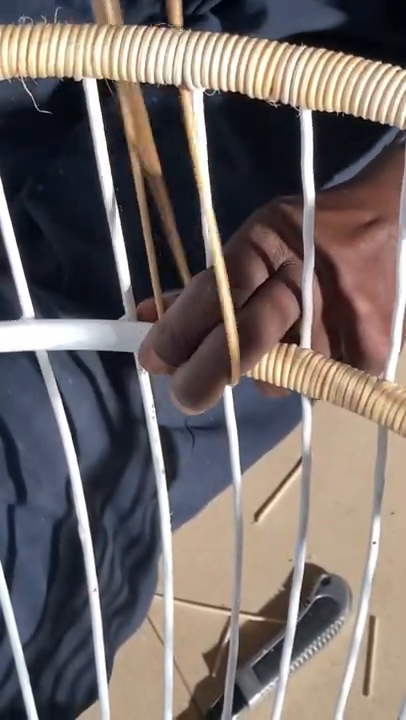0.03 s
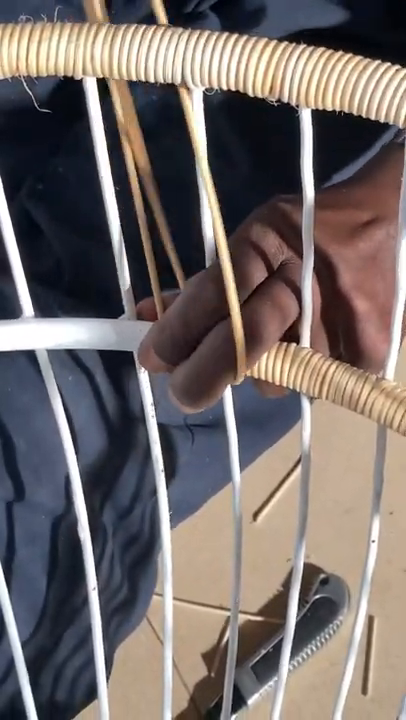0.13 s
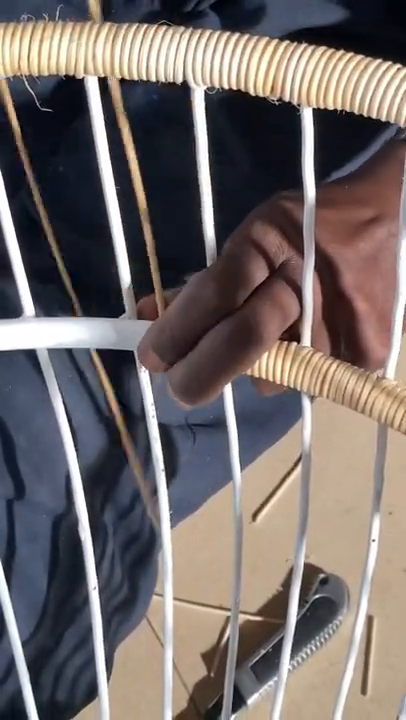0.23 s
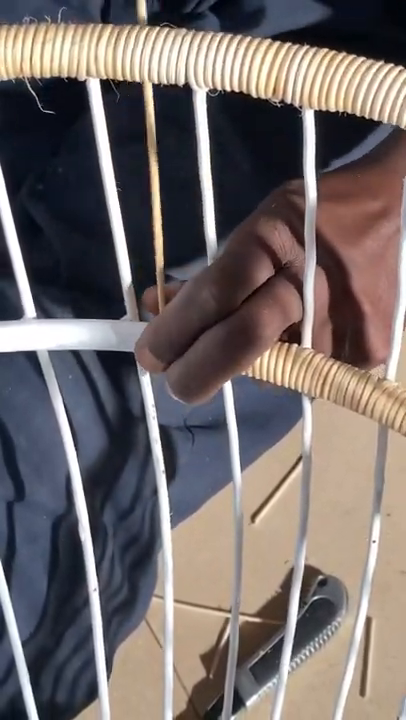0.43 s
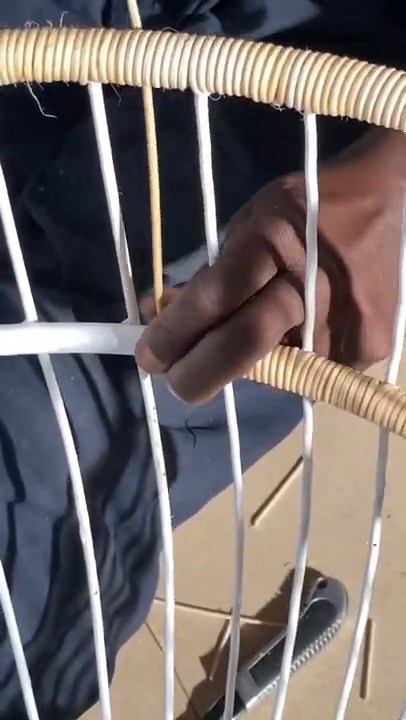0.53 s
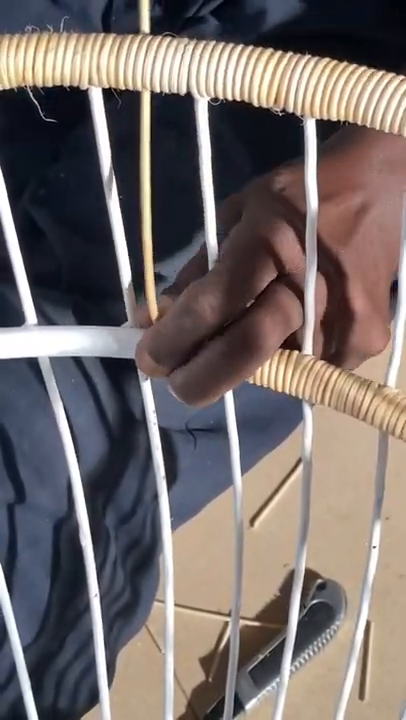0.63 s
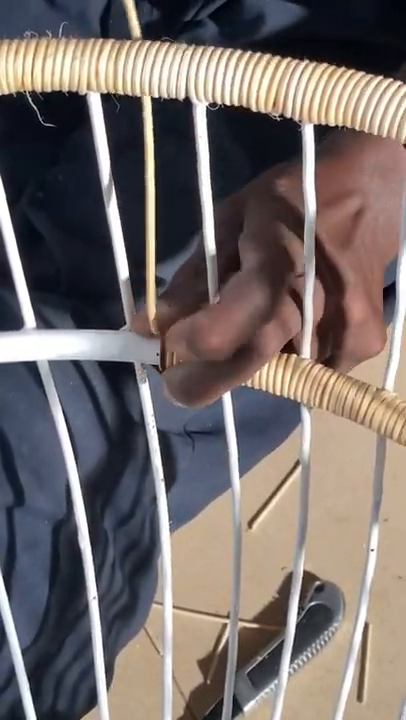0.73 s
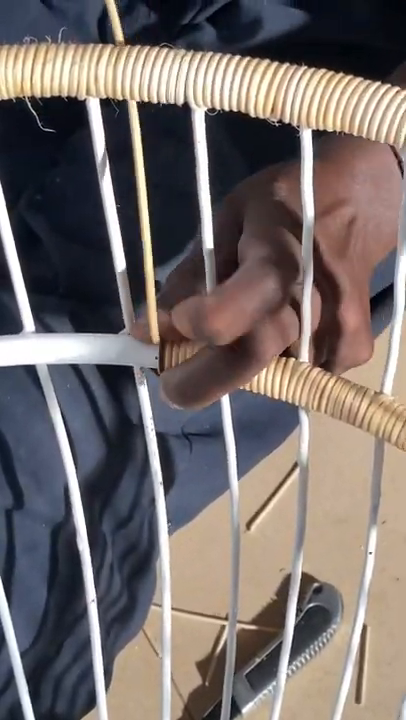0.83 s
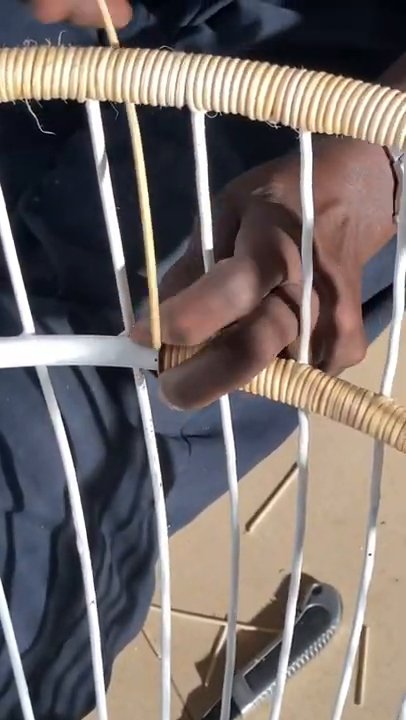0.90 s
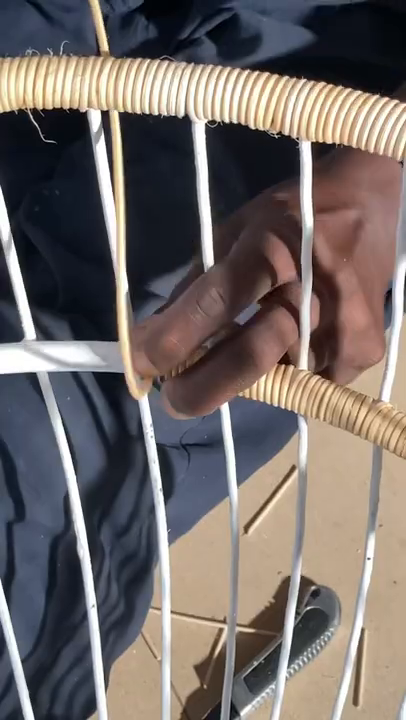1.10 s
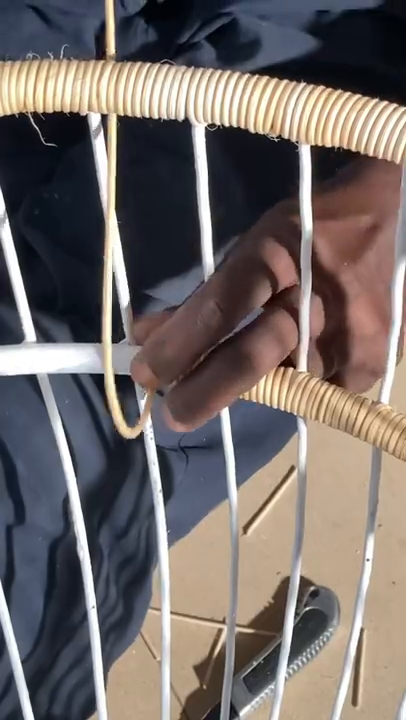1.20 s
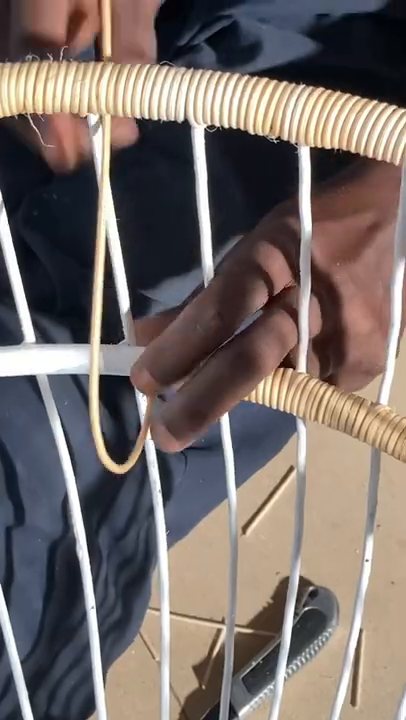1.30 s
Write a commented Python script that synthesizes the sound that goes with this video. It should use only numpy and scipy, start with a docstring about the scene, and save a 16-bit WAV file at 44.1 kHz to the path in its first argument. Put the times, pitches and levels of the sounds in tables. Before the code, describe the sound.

Cane is pulled through a metal chair frame with sharp snaps and a dull thud.

```python
"""Caning a steel chair

A cane strand hisses and ticks as it is drawn through a steel chair frame, close to two microphone
ports. Its loose end whips a ringing rod, then it snaps taut: the frame thuds and the windings clatter.
Fingers rub the strand into place over a quiet outdoor rumble and a faint hum."""
import sys
import numpy as np
from scipy import signal
from scipy.fft import rfft, irfft, next_fast_len
from scipy.io import wavfile
from scipy.ndimage import map_coordinates

SR = 44100
rng = np.random.default_rng(int(sys.argv[2]) if len(sys.argv) > 2 else 0)


def put_to_file(sound):
    """Save the sound as 16-bit audio at rate SR, in the file named by the first command-line argument."""
    columns = np.atleast_2d(sound).T  # one column per channel
    safe = np.clip(columns, -1, 1)
    whole_steps = np.round(safe * 32767)
    wavfile.write(sys.argv[1], SR, whole_steps.astype(np.int16))


N = 59535
TIME = np.arange(N) / SR
CRACK_ATTACK_S, FRAME_ATTACK_S = 0.00012, 0.0017


def amp(db):
    """Decibels to gain."""
    return 10 ** (np.asarray(db) / 20)


def unit(x):
    """Scale to rms 1."""
    return x / np.sqrt(np.mean(x ** 2) + 1e-20)


def along(points, hz):
    """Read a curve of (Hz, value) points on a log frequency axis."""
    freqs, values = np.transpose(points)
    return np.interp(np.log(hz + 1), np.log(freqs + 1), values)


def grid():
    """Frequencies of the padded transform, in Hz."""
    return np.fft.rfftfreq(2 * next_fast_len(N // 2 + 2048, True), 1 / SR)


def coloured(x, points, tilt_db=0):
    """Causal EQ through (Hz, dB) points that keeps the power of white noise."""
    hz = grid()
    octaves = np.log2(np.maximum(hz, 300) / 300)
    gain = unit(amp(along(points, hz) + tilt_db * octaves))
    cepstrum = irfft(np.log(gain + 1e-6))
    size = len(cepstrum)
    cepstrum[1:size // 2] *= 2  # fold to minimum phase
    cepstrum[size // 2 + 1:] = 0
    return irfft(rfft(x, size) * np.exp(rfft(cepstrum)))[..., :N]


def noise():
    """White noise in two rows: the part both ports share, and the part they do not."""
    return rng.standard_normal((2, N))


def grains(rate):
    """Tiny contacts of random time and size, rate a second, at rms 1."""
    return unit(noise() * (rng.random(N) < rate / SR))


def wobble(rate):
    """A smooth random curve, rate knots a second."""
    knots = rng.standard_normal(int(N * rate / SR) + 4)
    return map_coordinates(knots, [TIME * rate])


def decay(start, t60, attack):
    """An envelope with a quick rise and an exponential fall."""
    age = np.maximum(TIME - start, 0)
    return (1 - np.exp(-age / attack)) * np.exp(-np.log(1000) * age / t60)


def cue(tail, start, attack):
    """Fade a tail in and place it at its start time."""
    rise = 1 - np.exp(-np.arange(tail.shape[1]) / SR / attack)
    return np.pad(tail * rise, ((0, 0), (round(start * SR), N)))[:, :N]


def ring(start, modes, attack):
    """Decaying modes, each with a random phase."""
    t = np.arange(int(SR * max(t60 for hz, db, t60 in modes))) / SR
    tail = sum(amp(db - 60 * t / t60) * np.sin(2 * np.pi * (hz * t + rng.random((2, 1))))
               for hz, db, t60 in modes)
    return cue(np.sqrt(2) * tail, start, attack)


def wash(start, t60s, attack=0.0012):
    """A diffuse noisy tail in which each frequency dies at its own speed."""
    hz, t, spectrum = signal.stft(rng.standard_normal((2, SR * 2 // 3)), SR, nperseg=256)
    fade = np.exp(-np.log(1000) * t / along(t60s, hz)[:, None])
    tail = signal.istft(spectrum * fade, SR, nperseg=256)[1]
    return cue(tail, start, attack)


def shimmer(start, t60s, attack=0.002, count=900):
    """A metallic tail of many weak, close modes of random pitch and size."""
    jitter, chance, *phases = rng.random((count, 4)).T
    hz = (np.arange(count) + jitter) / count * SR / 2
    power = -np.log(chance + 1e-9)
    poles = (2j * np.pi * hz - np.log(1000) / np.maximum(along(t60s, hz), 0.01)) / SR
    weights = np.sqrt(2 * power / power.sum()) * np.exp(2j * np.pi * np.array(phases))
    step = np.arange(150)  # 150 blocks of 150 samples
    block_starts = weights[:, None] * np.exp(np.outer(step * len(step), poles))
    tail = (block_starts @ np.exp(np.outer(poles, step))).real.reshape(2, -1)
    return cue(tail, start, attack)


# Tone of the outdoor air. Each row: frequency in Hz, relative gain in dB.
RUMBLE_EQ = [(20, -8), (40, -4), (65, 6), (100, -7), (150, -7.5), (200, -9.5), (280, -7.5), (450, -17),
             (560, -14), (750, -25), (1080, -20), (1350, -26.5), (1900, -25.5), (2400, -28.5),
             (3200, -37.5), (6000, -57), (9500, -49), (15000, -54), (16200, -69)]
# Notes of the hum. Each row: pitch in Hz, level in dB.
HUM_TONES = [(60, -60.5), (129, -61.5)]

def background(rumble_db=-51.5, swell_db=1, waver_db=2.5):
    """A bed of low outdoor rumble and faint wavering hum."""
    hum = 0
    for hz, db in HUM_TONES:
        level = amp(db + waver_db * wobble(7.9))
        phase = 2 * np.pi * (hz * TIME + rng.random((2, 1))) + 0.5 * wobble(5.9)
        hum += level * np.sin(phase)
    return amp(rumble_db + swell_db * wobble(8)) * coloured(noise(), RUMBLE_EQ) + hum


def frame_swing(level_db=-47, t60_s=0.38):
    """The frame's lowest mode, already swinging from handling, fades away."""
    lowest_hz = FRAME_MODES[0][0]
    return ring(0, [(lowest_hz, level_db, t60_s)], FRAME_ATTACK_S)


# Fader curve of the sliding strand. Each row: time in seconds, level in dB.
SLIDE_LEVELS = [(0, -47), (.03, -54.5), (.09, -57), (.118, -51.5), (0.161, -60), (0.222, -44), (.41, -59.5),
                (0.599, -57), (0.691, -70.5), (.8, -72.5), (.87, -68), (.93, -70), (0.999, -81), (1.2, -82),
                (1.271, -74.5), (1.35, -75)]
# Its bright hiss. Each row: frequency in Hz, relative gain in dB.
SLIDE_EQ = [(300, -14), (1200, 2), (2300, 3), (4000, 6.5), (6000, 4), (9500, 3), (13000, -14), (15200, -13),
            (16500, -33)]

def slide(rough_db=2.0, fibres_per_s=440, fibre_db=-7):
    """Cane rubs over steel and skin: an uneven hiss with tiny catches of its fibres."""
    level_db = np.interp(TIME, *np.transpose(SLIDE_LEVELS)) + rough_db * wobble(90)
    friction = noise() + amp(fibre_db) * grains(fibres_per_s)
    return coloured(amp(level_db) * friction, SLIDE_EQ)


# Ticks and snaps of the cane. Each row: start in seconds, level in dB, crack t60 in seconds,
# tail in dB relative to the snap, tilt in dB per octave.
SNAP_CUES = [(.006, -48, 0.0024, -26.5, -10), (.0095, -28.5, 0.0056, -31.5, 4.5),
             (.0510, -30.5, 0.0053, -20.5, 4), (0.1953, -30.5, .006, -36.5, 7),
             (0.4380, -18, 0.0056, -24.5, 2.5), (0.4526, -19.5, 0.0018, -37, 6),
             (0.4661, -21.5, 0.0233, -18, -0.4), (0.4692, -14, 0.0063, -22.5, 0.2),
             (.9145, -47.5, 0.0032, -49, 4)]
# Their crisp tone. Each row: frequency in Hz, relative gain in dB.
SNAP_EQ = [(150, -9.5), (650, -13), (950, -19), (1600, -9), (2900, -8.5), (4000, 4.5), (4700, -0.5),
           (5600, -11), (7300, -1), (8600, 1), (10700, -4.5), (12500, -8), (15400, -10), (16500, -37)]
# Their tail through frame and windings. Each row: frequency in Hz, t60 in seconds.
SNAP_DECAYS = [(800, 0.1), (3500, 0.45), (6000, 0.2), (10000, 0.32), (15000, 0.097)]
# Woody ring of taut cane. Each row: pitch in Hz, level in dB relative to the snap, t60 in seconds.
CANE_MODES = [(867.4, -37, 0.11), (1395, -30.5, .06), (1973, -25, 0.058), (2338, -27, 0.077),
              (2720, -35, 0.099), (3405, -37, .25), (4124, -31.5, 0.22)]

def snaps():
    """The strand catches and lets go: a dry crack, a woody ring and a diffuse tail."""
    track = 0
    for start, db, t60, tail_db, tilt_db in SNAP_CUES:
        crack = noise() * decay(start, t60, CRACK_ATTACK_S)
        tail = amp(tail_db) * wash(start, SNAP_DECAYS)
        wood = ring(start, CANE_MODES, CRACK_ATTACK_S)
        track += amp(db) * (coloured(crack + tail, SNAP_EQ, tilt_db) + wood)
    return track


# Hits of the loose end on a rod. Each row: start in seconds, level in dB.
WHIP_CUES = [(0.2219, -11), (0.2235, -21), (0.23, -28.5)]
# Their sharp tone. Each row: frequency in Hz, relative gain in dB.
WHIP_EQ = [(200, -44.5), (950, -39), (1400, -15), (1850, -12), (2400, 2), (2850, -19.5), (3350, -9),
           (3900, -11), (4700, 0.5), (5150, -4.5), (5700, -13.5), (6800, 5.5), (7800, -3.5), (8400, -0.5),
           (10500, 1.5), (13000, -12), (14000, -2.5), (15400, -3.5), (16500, -20)]
# The frame's dense high shimmer. Each row: frequency in Hz, t60 in seconds.
WHIP_DECAYS = [(1000, .35), (3000, 0.45), (7000, 0.31), (10500, 0.1), (12000, 0.11), (13500, 0.24),
               (15000, 0.073)]
# Ring of the steel rod. Each row: pitch in Hz, level in dB relative to the first hit, t60 in seconds.
ROD_MODES = [(634.6, -42, 0.17), (2105, -37, 0.64), (2354, -33, 0.31), (2457, -33.5, 0.258),
             (2674, -35.5, .2), (3220, -29.5, .2), (3445, -37.5, 0.3), (4230, -40.5, 0.52),
             (5170, -37.5, .33), (5200, -17.5, 0.11), (6680, -24.5, 0.15), (6940, -26.5, .29),
             (7795, -34.5, 0.28), (10275, -21.5, 0.11), (10860, -26.5, 0.24), (13270, -28, .09)]

def whip(crack_t60_s=0.018, tail_db=-14.5):
    """The cane's end cracks on a rod, which rings briefly among the many modes of the frame."""
    cracks = sum(amp(db) * noise() * decay(start, crack_t60_s, CRACK_ATTACK_S)
                 for start, db in WHIP_CUES)
    start, db = WHIP_CUES[0]
    tail = amp(db + tail_db) * shimmer(start, WHIP_DECAYS)
    rod = amp(db) * ring(start, ROD_MODES, CRACK_ATTACK_S)
    return coloured(cracks + tail, WHIP_EQ) + rod


def lurch(centre_s=0.4838, level_db=-32, pitch_hz=220, half_width_s=0.0035):
    """The frame's one heavy lurch: a short low pulse that both ports share."""
    t = TIME - centre_s
    pulse = np.exp(-(t / half_width_s) ** 2) * np.sin(2 * np.pi * pitch_hz * t)
    return np.outer([1, 0], amp(level_db) * pulse)


# Tugs of the strand on the frame. Each row: start in seconds, level in dB.
TUG_CUES = [(0.437, -54), (0.471, -43), (.4790, -44)]
# Their dull tone. Each row: frequency in Hz, relative gain in dB.
THUD_EQ = [(60, -28), (180, -10.5), (320, 11.5), (420, -2.5), (600, -6.5), (900, -4.5), (1500, -15.5),
           (4000, -47)]
# Low ring of the frame. Each row: pitch in Hz, level in dB relative to the last tug, t60 in seconds.
FRAME_MODES = [(128.6, -14, 0.68), (171, -7.5, 0.96), (229, -5, 0.65), (275, -14, 2.1), (298.3, -12, 0.91),
               (338.2, -7, 0.33), (495, -26, 1.5), (541, -18.5, 0.4)]

def thud(knock_trim_db=-0.5, knock_t60_s=0.0496, shudder_db=-13, shudder_t60_s=0.72):
    """The taut strand jerks the whole frame: dull knocks, one lurch, then a low shudder and ringing."""
    knocks = 0
    for start, db in TUG_CUES:
        knock = decay(start, knock_t60_s, FRAME_ATTACK_S)
        shudder = amp(shudder_db) * decay(start, shudder_t60_s, FRAME_ATTACK_S)
        knocks += amp(db) * noise() * (knock + shudder)
    start, db = TUG_CUES[-1]
    frame = amp(db) * ring(start, FRAME_MODES, FRAME_ATTACK_S)
    return amp(knock_trim_db) * coloured(knocks, THUD_EQ) + lurch() + frame


# Shakes of the windings. Each row: start in seconds, level in dB.
CLATTER_CUES = [(0.4393, -46), (.48, -48.5)]
# Their woody midrange. Each row: frequency in Hz, relative gain in dB.
CLATTER_EQ = [(150, -29), (300, -10), (450, -3), (600, 1.5), (750, -5), (1000, -1.5), (1400, -6.5),
              (2000, -1), (2800, -6), (4000, -10.5), (8000, -47.5)]
# Their tail. Each row: frequency in Hz, t60 in seconds.
CLATTER_DECAYS = [(600, 0.6), (3000, 0.58)]

def clatter(taps_per_s=280, tap_db=-4.5, patter_t60_s=0.44, attack_s=0.0013):
    """Jerks shake the windings against the frame: a fading patter of taps over a diffuse tail."""
    patter = 0
    for start, db in CLATTER_CUES:
        taps = amp(tap_db) * grains(taps_per_s) * decay(start, patter_t60_s, attack_s)
        patter += amp(db) * (taps + wash(start, CLATTER_DECAYS, attack_s))
    return coloured(patter, CLATTER_EQ)


# Fingers working the strand into place. Each row: centre in seconds, half width in seconds, level in dB.
SCRAPE_CUES = [(0.883, 0.0189, -59), (0.93, 0.0173, -54), (1.129, 0.019, -65), (1.176, .02, -69),
               (1.228, 0.017, -66.5)]
# Their raspy tone. Each row: frequency in Hz, relative gain in dB.
SCRAPE_EQ = [(300, -49), (800, 2), (1080, 10.5), (1500, -3.5), (2000, 0), (2400, 7.5), (2750, 0),
             (3200, -8), (4600, -1), (6000, -40), (9000, -14.5), (16000, -32)]

def scrapes(slips_per_s=1800):
    """Short rubs of skin on cane, made of many tiny slips."""
    strokes = sum(amp(db) * np.exp(-2 * ((TIME - centre) / half_width) ** 2)
                  for centre, half_width, db in SCRAPE_CUES)
    return coloured(grains(slips_per_s) * strokes, SCRAPE_EQ)


def comb_colour(x, wet_db=-4.5, spread_s=0.006, count=9):
    """A few faint, very short delays give the strand's sounds a slightly hollow, comb-like colour."""
    lags = ((0.1 + rng.random(count)) * spread_s * SR).astype(int)
    delayed = sum((-1) ** k * np.pad(x, ((0, 0), (lag, 0)))[:, :N] for k, lag in enumerate(lags))
    return (x + amp(wet_db) * delayed / np.sqrt(count)) / np.hypot(1, amp(wet_db))


# Timing between the ports. Each row: frequency in Hz, phase lead of left over right in radians.
PORT_LEAD = [(200, 0), (450, .1), (1200, 2), (2200, 3.6), (4000, 2.9), (5600, 3.2), (7400, 5.1),
             (8500, 6.3), (9700, 7.5), (12000, 9.4), (14500, 11.8), (16000, 12.8)]
# Stereo width. Each row: frequency in Hz, likeness of the two ports from 0 to 1.
PORT_COHERENCE = [(130, .96), (300, .8), (700, .35), (1500, .35), (3000, .6), (5600, .92), (7500, .7),
                  (10000, .65), (12000, .9), (15000, .65)]
# Stereo balance. Each row: frequency in Hz, level of left over right in dB.
PORT_PAN = [(60, -1.5), (600, -1), (1500, -0.15), (10000, 0)]

def ports(x):
    """Spread the shared and unshared parts over two ports; the left one hears the treble first."""
    hz = grid()
    width = np.arccos(np.clip(along(PORT_COHERENCE, hz), -1, 1)) / 2
    shared, unshared = rfft(x, 2 * (len(hz) - 1)) * [np.cos(width), np.sin(width)]
    lean = np.exp(1j * along(PORT_LEAD, hz) / 2) * amp(along(PORT_PAN, hz) / 2)
    left, right = (shared + unshared) * lean, (shared - unshared) / lean
    return irfft(np.array([left, right]))[:, :N]


def scene():
    """Chair, strand and outdoor bed, mixed at the two ports."""
    chair = whip() + thud() + clatter() + frame_swing()
    strand = comb_colour(snaps() + slide() + scrapes())
    return ports(chair + strand + background())


def record(dry, top_hz=16500):
    """A brick-wall low-pass takes off the very top."""
    hz = grid()
    return irfft(rfft(dry, 2 * (len(hz) - 1)) * (hz < top_hz))[:, :N]


dry = scene()
out = record(dry)
put_to_file(out)
```